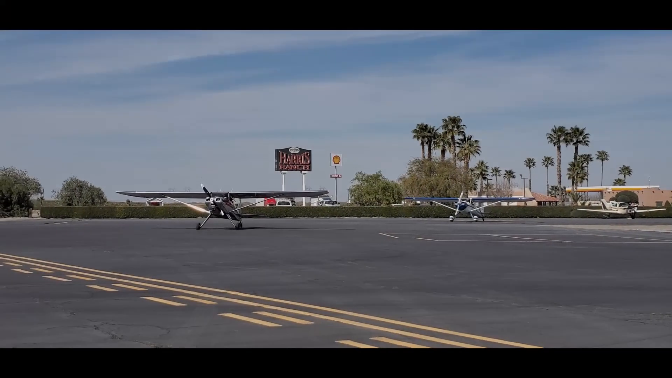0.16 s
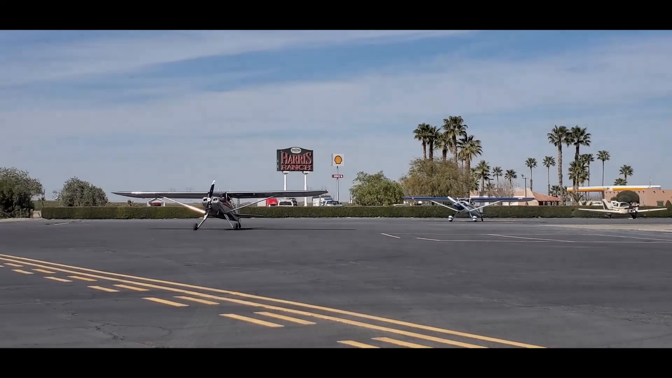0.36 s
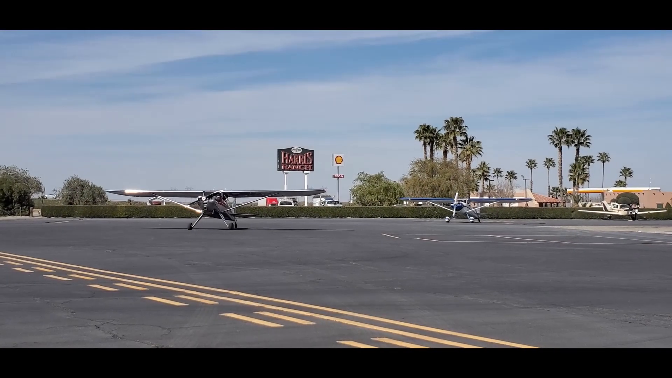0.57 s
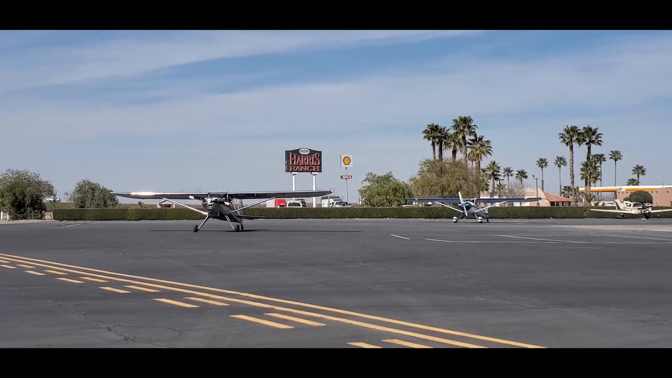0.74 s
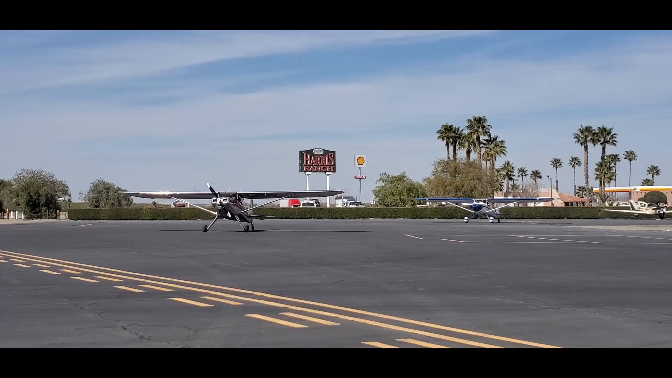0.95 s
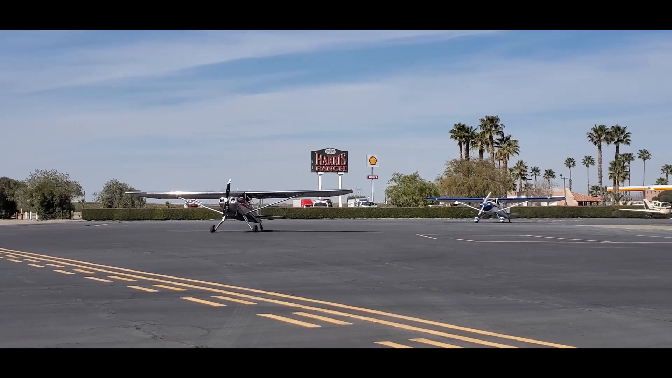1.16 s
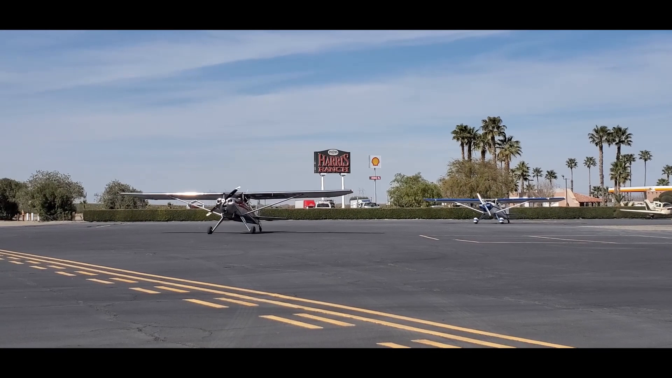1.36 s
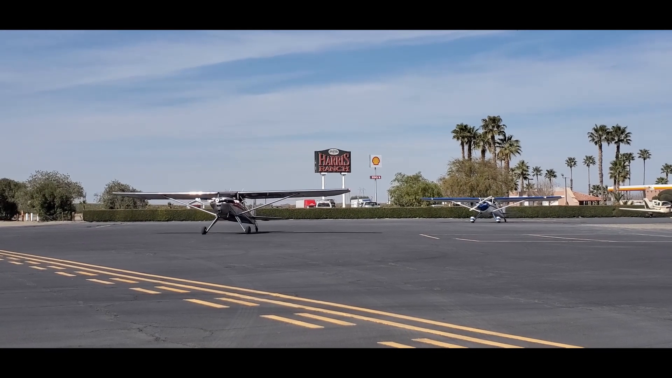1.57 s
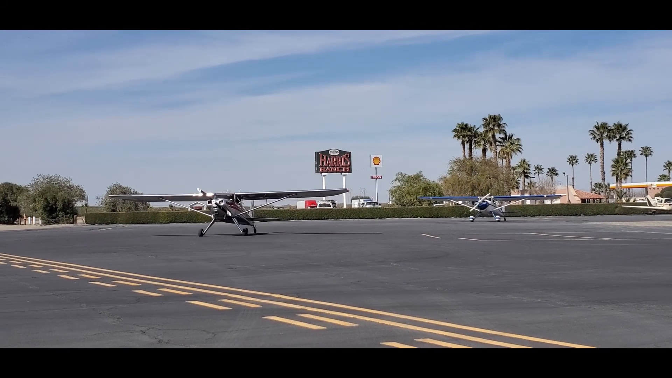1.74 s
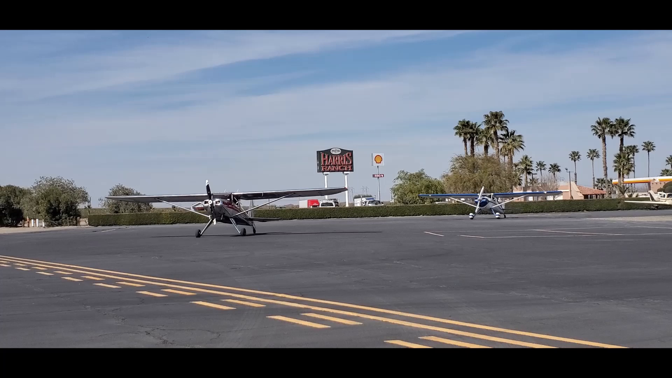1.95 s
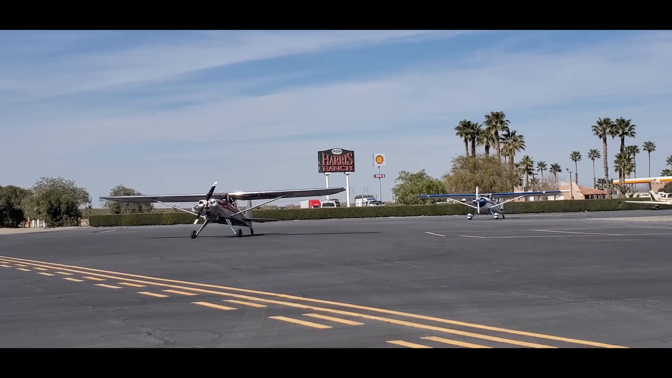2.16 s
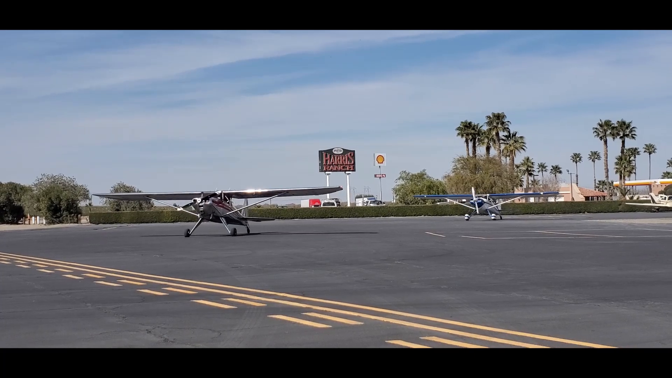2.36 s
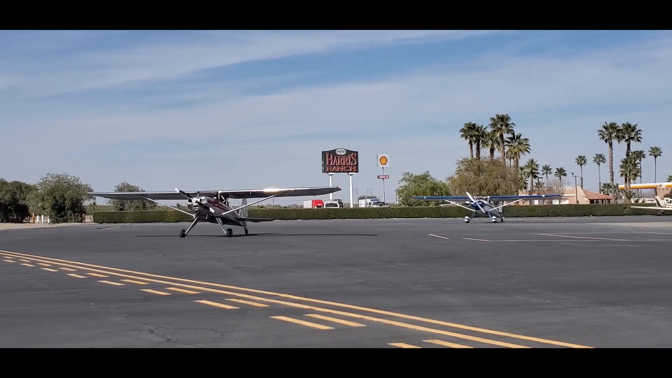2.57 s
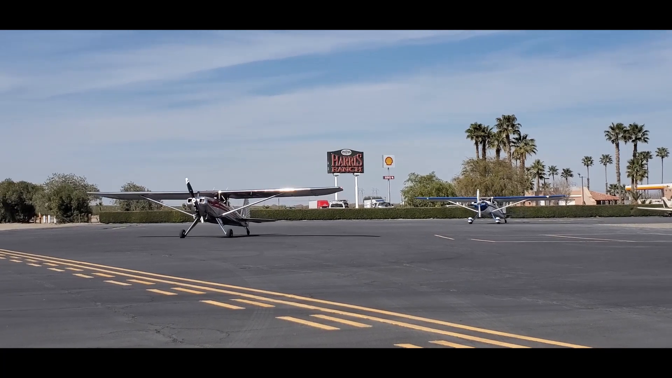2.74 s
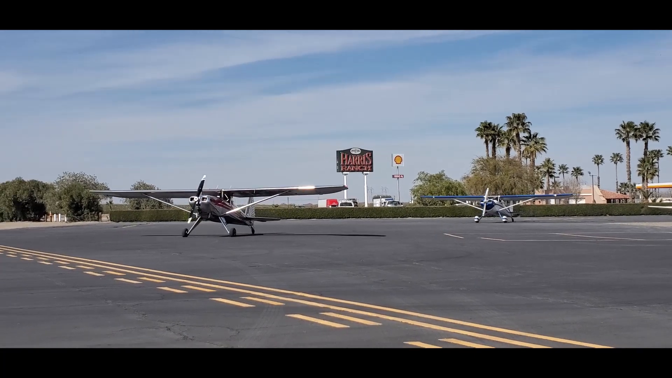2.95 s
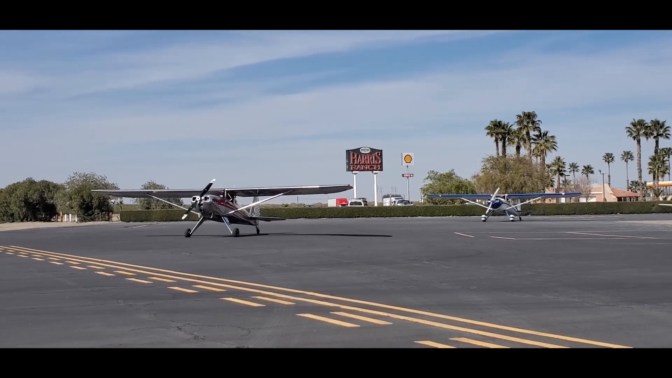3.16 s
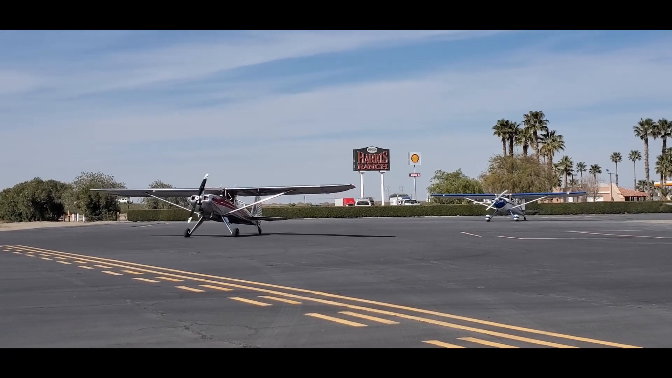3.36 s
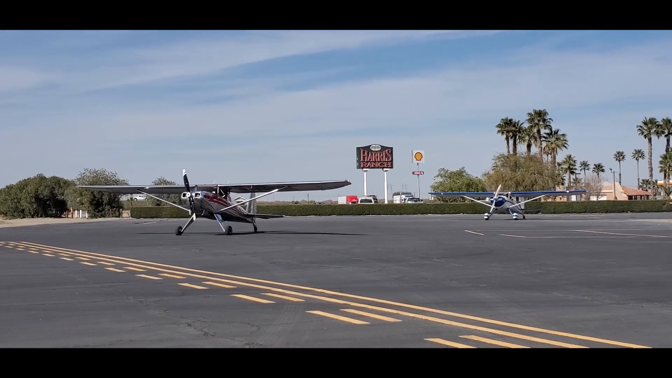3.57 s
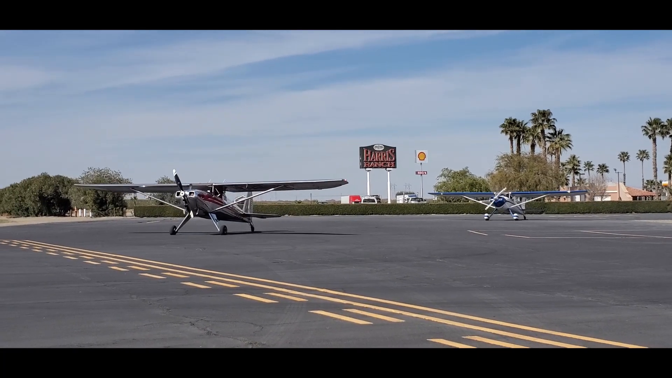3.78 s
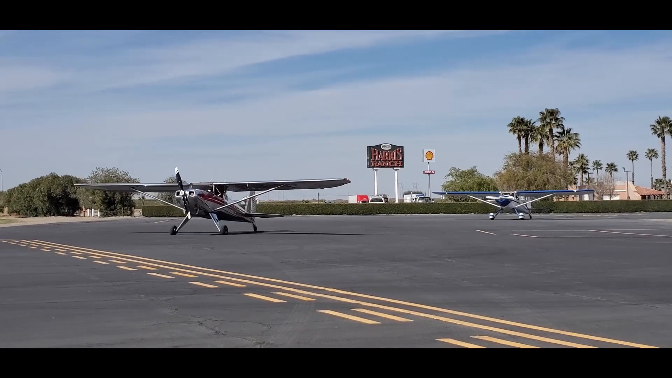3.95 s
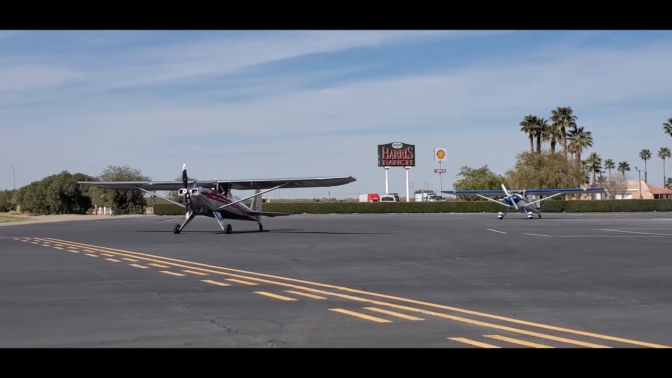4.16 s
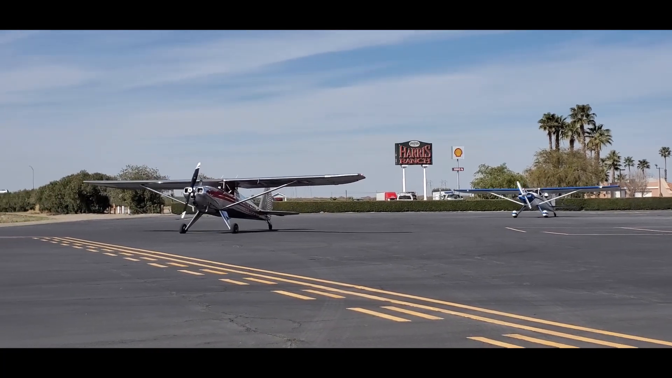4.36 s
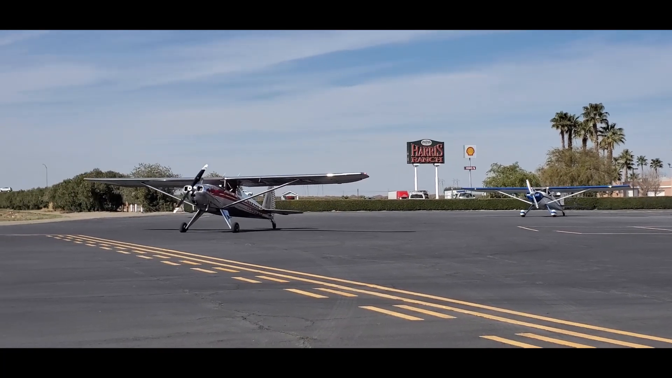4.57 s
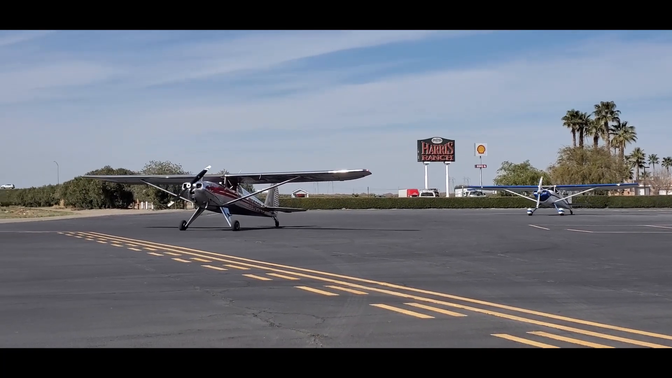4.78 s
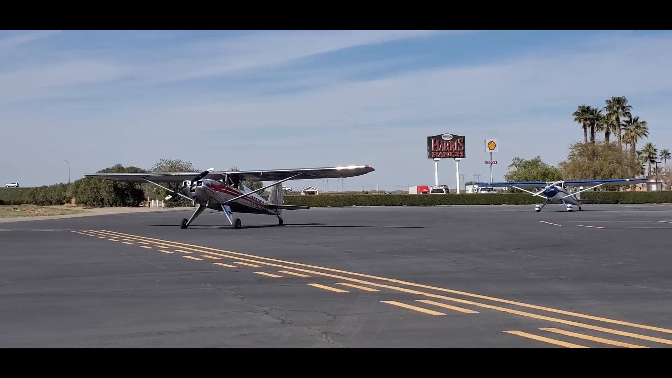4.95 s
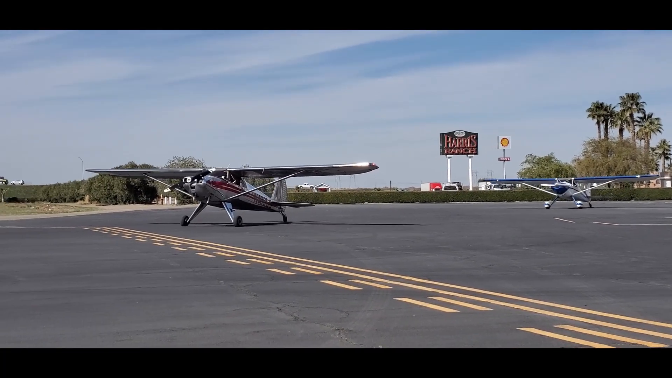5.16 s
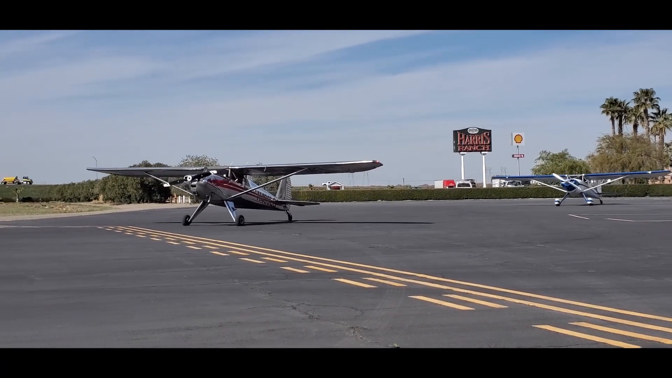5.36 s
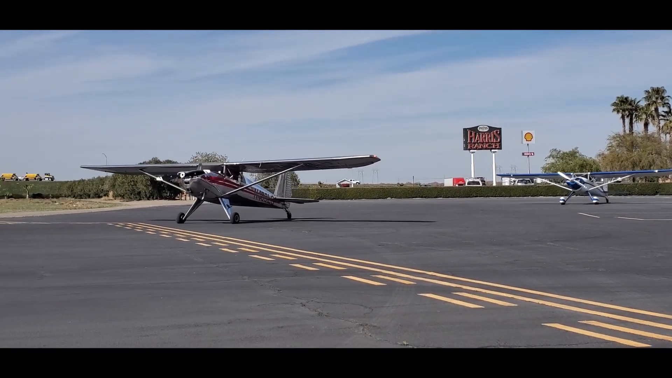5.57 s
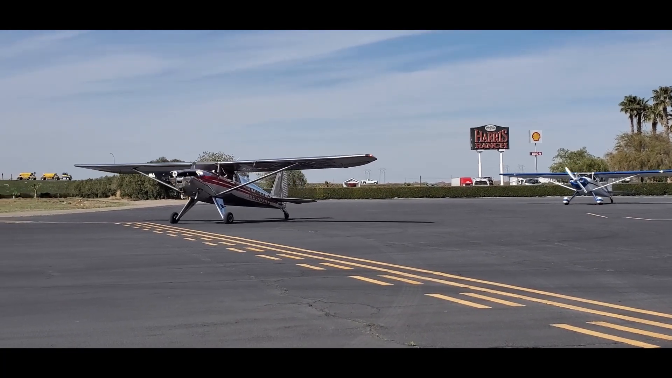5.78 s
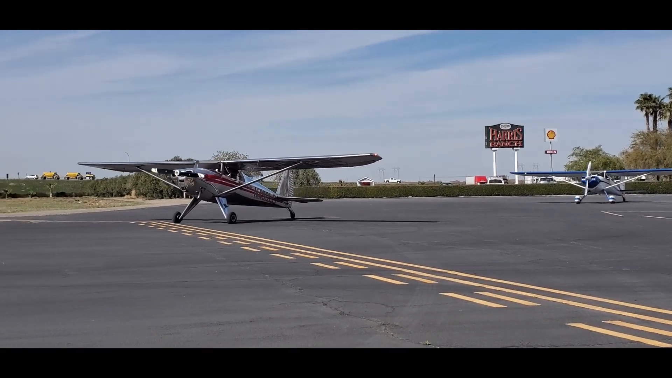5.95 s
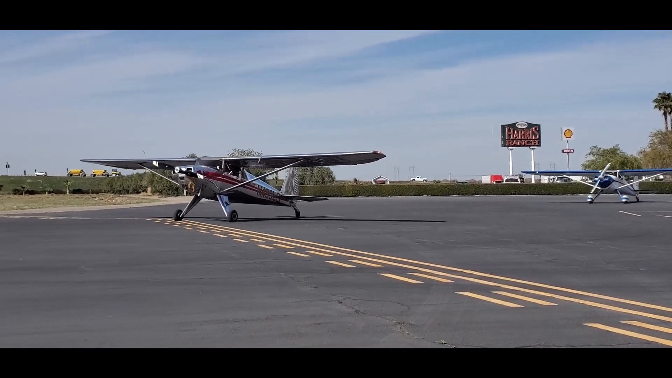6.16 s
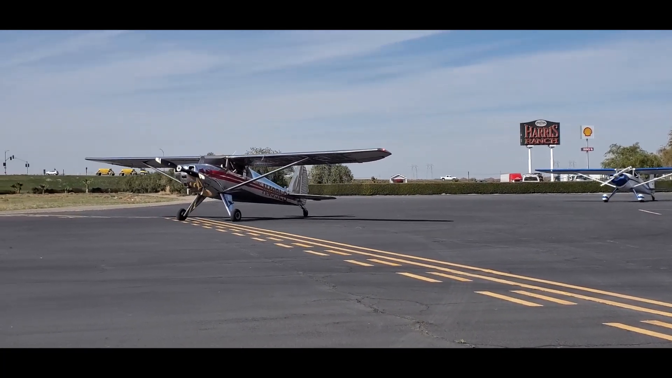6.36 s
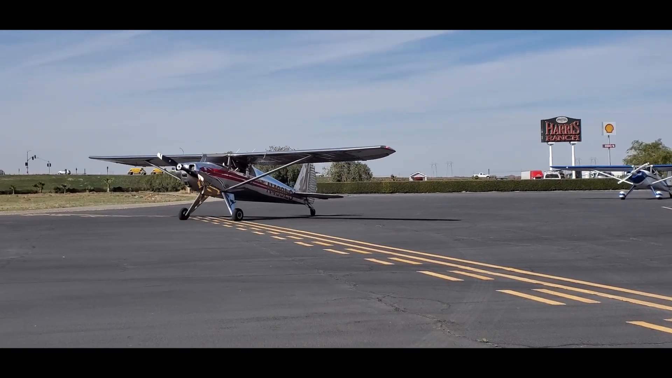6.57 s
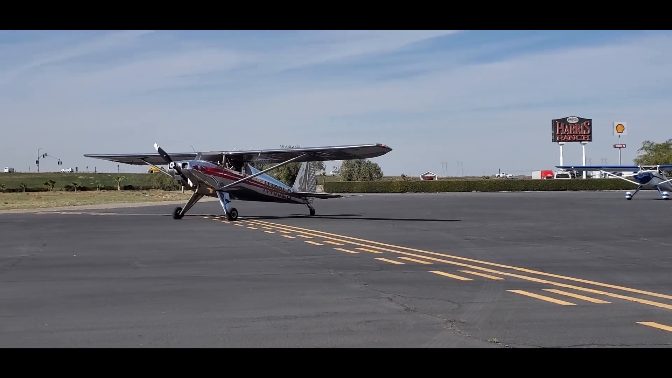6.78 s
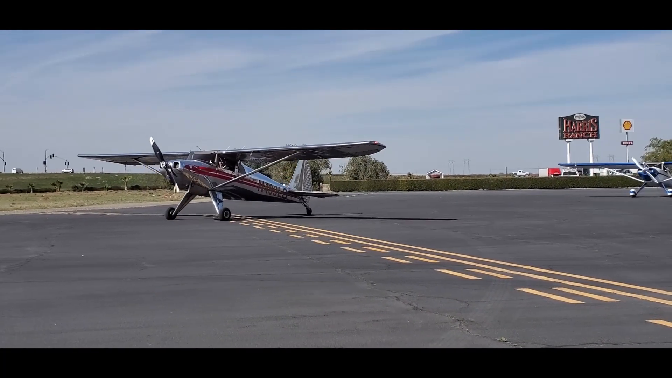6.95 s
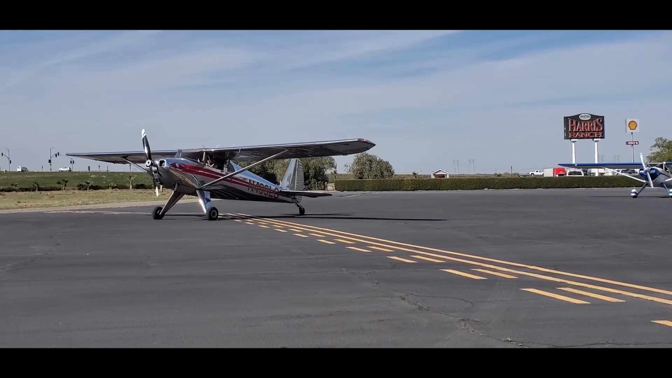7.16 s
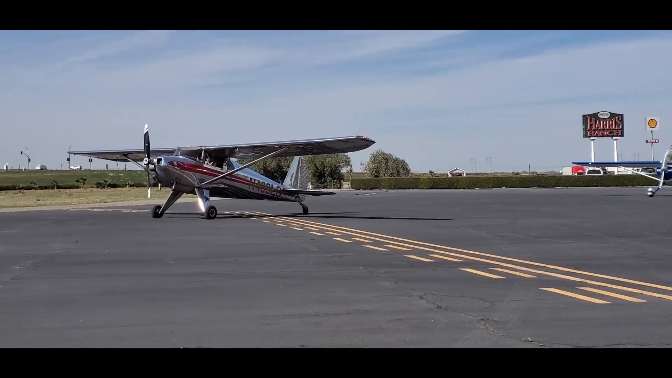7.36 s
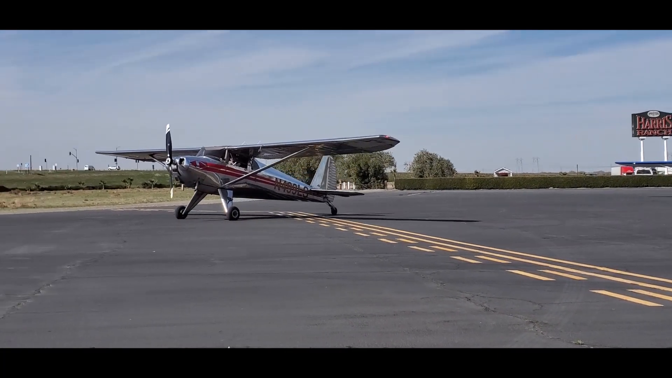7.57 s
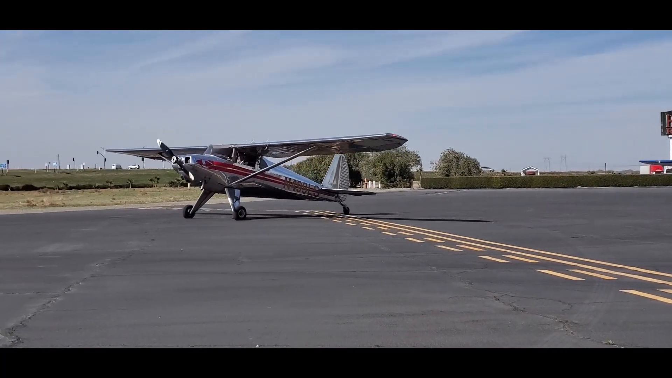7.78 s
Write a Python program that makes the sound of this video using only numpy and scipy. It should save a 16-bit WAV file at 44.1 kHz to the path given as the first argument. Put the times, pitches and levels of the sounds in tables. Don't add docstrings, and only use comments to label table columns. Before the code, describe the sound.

A small piston airplane idles and taxis nearby, its engine humming and popping rapidly through roaring propeller wash while a second plane drones farther off.

```python
import sys
import numpy as np
from scipy import signal
from scipy.fft import rfft, irfft, next_fast_len
from scipy.io import wavfile
from scipy.ndimage import uniform_filter1d, map_coordinates

SR = 44100
rng = np.random.default_rng(int(sys.argv[2]) if len(sys.argv) > 2 else 0)


def generate_wav(sig):
    pcm = np.round(np.clip(np.atleast_2d(sig).T, -1, 1) * 32767).astype(np.int16)
    wavfile.write(sys.argv[1], SR, pcm)


def nominal_scale(level):
    x = np.asarray(level, float) / 20
    return 10 ** x


N = 344862
T = np.arange(N) / SR


def unit(x):
    return x / np.sqrt(np.mean(x ** 2))


def curves(table):
    s, *columns = np.transpose(table)
    return [np.interp(T, s, column) for column in columns]


def along(table, hz):
    table_hz, value = np.transpose(table)
    return np.interp(np.log(hz + 1), np.log(table_hz), value)


def ring(x, hz, width_hz):
    b, a = signal.iirpeak(hz, hz / width_hz, fs=SR)
    return signal.lfilter(b, a, signal.lfilter(b, a, x))


def walk(rate_hz, stride=1):
    steps = np.repeat(rng.standard_normal(int(N / SR * rate_hz) + 2), 8)
    soft = uniform_filter1d(uniform_filter1d(steps, size=8), size=8)
    return 1.3 * np.interp(T[::stride] * rate_hz * 8, np.arange(len(soft)), soft)


# [start_s, firing_rate_hz]
NEAR_THROTTLE = [(0, 28.58), (.59, 29.147), (.761, 29.521), (1.266, 28.807), (1.515, 29.697),
                 (1.776, 28.947), (1.993, 29.401), (3.015, 28.96), (3.496, 31.505), (4.075, 29.927),
                 (4.495, 29.799), (5.31, 30.095), (5.877, 30.209), (6.063, 29.859), (6.264, 30.339),
                 (7.216, 29.701), (7.82, 30.6)]
# [start_s, firing_rate_hz]
FAR_THROTTLE = [(0.0, 37.642), (0.6, 37.426), (1.2, 37.321), (1.8, 36.81), (2.41, 35.784), (3.01, 35.034),
                (3.61, 34.781), (4.21, 34.662), (4.81, 34.532), (5.41, 34.644), (6.02, 34.836),
                (6.62, 34.701), (7.22, 34.634), (7.82, 34.576)]


def firing_counts():
    return [np.cumsum(curves(table)[0]) / SR for table in (NEAR_THROTTLE, FAR_THROTTLE)]


def hum(firings, level_db, orders, lag, muffler, scatter):
    stride = 8
    slow_firings = firings[::stride] - lag
    out = 0
    for k, db in orders:
        uneven = k % 4 > 0
        turns = k / 4 * slow_firings + (k > muffler) / 2
        turns = turns + uneven * scatter * (rng.random() - 1)
        slip_rad = .12 * (1 + uneven) * walk(5, stride)
        wander_db = .9 * (.5 + uneven) * walk(4, stride)
        out = out + nominal_scale(db - 1.5 * uneven + wander_db) * np.cos(2 * np.pi * turns + slip_rad)
    return np.sqrt(2) * nominal_scale(level_db) * np.interp(T, T[::stride], out)


# [multiple of the four-firing cycle, level_db]
NEAR_ORDERS = [(4, -36), (8, -9), (9, -24), (10, -21), (11, -18), (12, 0), (13, -16), (14, -13), (15, -13),
               (16, -11), (17, -19), (18, -23), (19, -14), (20, -16), (21, -24), (22, -17), (24, -25),
               (26, -24), (27, -28), (28, -21), (32, -25)]


def near_hum(firings, fade_db):
    return hum(firings, -24.5 + 0.58 * T + fade_db, NEAR_ORDERS, lag=.255, muffler=8.7, scatter=.3)


# [peak_s, peak_db, top_hiss_db over the peak]
HARD_FIRINGS = [(0.6983, -23, -13), (1.1433, -19, -20), (1.6585, -16.5, -19), (2.239, -15, -15),
                (2.7876, -16, -21), (3.3943, -19, -20), (3.457, -13.5, -16), (3.9748, -14.5, -7),
                (4.0767, -17, -21), (4.21, -14, -17), (4.3107, -14, -22), (4.377, -16.5, -9.5),
                (4.5102, -14.5, -13), (4.6454, -13, -14), (4.7782, -13.5, -19), (4.9126, -16, -15),
                (5.0458, -13.5, -17), (5.3127, -14, -21), (5.446, -14.5, -19), (5.5782, -15.5, -25),
                (5.711, -17.5, -14), (6.0087, -17.5, -17), (6.606, -18, -11), (6.7398, -16, -13),
                (6.8734, -16, -14.5), (6.9718, -17, -8.5), (7.1067, -17.5, -7.5), (7.174, -17, -7.5),
                (7.3731, -17, -8.5), (7.64, -13.5, -13)]
CYLINDER_DB = np.array([4.0, 6.0, 1, 3.5])
CYLINDER_DB_PER_S = np.array([-0.025, -0.32, .6, 0.3])
# [pitch_hz, width_hz, level_db]
STUB = [(1420, 210, 6), (2200, 420, -3), (3278, 640, 12), (3640, 560, 12.5), (4155, 280, 8.5),
        (4890, 650, 5.5), (5460, 850, 1), (5970, 530, -17)]
# [pitch_hz, width_hz, level_db]
HISS = [(8800, 1000, -11.5), (11200, 1350, -1), (12300, 1950, 4), (13600, 1800, -5), (15300, 1300, -9)]


def exhaust(firings, spit_db, hiss_db):
    chance = rng.standard_normal((int(firings[-1]) + 3, 3 + len(STUB) + len(HISS)))
    count = np.arange(len(chance))
    cylinder = count % 4
    start = np.interp(count + 0.198, firings, T) + 0.00036 * chance[:, 0]
    drift_db = np.asarray(CYLINDER_DB_PER_S)[cylinder] * (start - T[-1] / 2)
    cylinder_db = np.asarray(CYLINDER_DB)[cylinder] + drift_db
    size_db = np.interp(start, T, spit_db) + cylinder_db + 3.45 * np.clip(chance[:, 1], -3, 1) - 3.0
    top_db = np.interp(start, T, hiss_db) + 1.28 * cylinder_db + 2.45 * chance[:, 2]
    for s, peak_db, rel_db in HARD_FIRINGS:
        nearest = np.argmin(abs(start + .0025 - s))
        start[nearest] = s - .0012
        size_db[nearest] = peak_db - 14
        top_db[nearest] = peak_db + rel_db - 12

    k = np.clip(np.searchsorted(start, T) - 1, 0, None)
    age = np.maximum(T - start[k], 0)
    tail = (1 - np.exp(-age / 0.0011)) * np.exp(-age / 0.0042)
    out, column = 0, 3
    for modes, db, fade_s in ((STUB, size_db, .0013), (HISS, top_db, .0016)):
        puff = (age / fade_s) ** 1.02 * np.exp(-age / fade_s)
        gas = rng.standard_normal((5, N))
        jet = puff * (gas[0] + .3 * gas[1:3]) + 0.58 * tail * gas[3:]
        sound = 0
        for hz, width_hz, mode_db in modes:
            colour_db = 3.8 * chance[:, column]
            sound = sound + ring(nominal_scale(mode_db + colour_db)[k] * jet, hz, width_hz) / np.sqrt(width_hz)
            column += 1
        energy = np.bincount(k, np.mean(sound ** 2, axis=0), len(count)) / (SR / 30) + 1e-12
        gain = (nominal_scale(db) / np.sqrt(energy))[k]
        out = out + sound * uniform_filter1d(gain, size=40)
    return out


# [pitch_hz, level_db per Hz]
WASH_SPECTRUM = [(20, -46), (45, -28), (90, -16.5), (170, -20.5),
                 (260, -19), (350, -25.5), (520, -23), (1000, -26), (1600, -28.5), (2100, -31), (2600, -35),
        (3600, -35.5), (5200, -49), (7800, -60.5), (9500, -54.5)]
# [pitch_hz, likeness 0-1]
LIKENESS = [(60, 0.94), (300, 0.96), (700, 0.91), (1400, 0.66), (3000, 0.21), (8000, 0.37)]


def wash(firings, level_db, left_db, rush_db):
    size = next_fast_len(N)
    hz = np.arange(size // 2 + 1) * SR / size
    like = np.clip(along(LIKENESS, hz), 0, 1)
    noise = rfft(rng.standard_normal((2, size))) * nominal_scale(along(WASH_SPECTRUM, hz))
    mid, side = noise * np.sqrt([1 + like, 1 - like])
    ports = np.array([mid + side, mid - side])
    body = irfft(ports[0] * (hz > 350) * (hz < 2000), size)
    scale = np.sqrt(np.mean(body ** 2))

    throb_db = 1.84 * np.cos(4 * np.pi * (firings - .47))
    throb_db = throb_db + 0.88 * np.cos(2 * np.pi * (firings - .3))
    throb_db = throb_db + 0.58 * np.cos(np.pi * (firings - .3))
    flank_db = (left_db + 8.0) * np.array([[1.3], [.4]])
    octave = np.log2((hz + 1) / 28)
    out, swell = 0, walk(0.72)
    for centre in np.arange(0, 9, .5):
        band_hz = 28 * 2 ** centre
        band = np.cos(np.pi * np.clip(octave - centre, -.5, .5)) ** 2
        db = level_db + 0.057 * swell + 1.65 * walk(9) + throb_db * (band_hz > 300)
        db = db + flank_db * (2200 < band_hz < 2900)
        db = db + (rush_db - rush_db.mean()) * (band_hz > 2900)
        out = out + nominal_scale(db) * irfft(ports * band, size)[:, :N]
    return out / scale


# [pitch_hz, width_hz, level_db over the wash]
PIPE = [(524.5, 49, -14), (1041, 53, -14.5), (1597, 81, -16)]


def pipe(firings, level_db):
    gust_db = 2.4 * np.cos(4 * np.pi * (firings - .4)) + 3.2 * np.cos(np.pi * (firings - .8))
    flow = rng.standard_normal(N) * nominal_scale(gust_db + 1.46 * walk(25))
    out = 0
    for hz, width_hz, db in PIPE:
        out = out + nominal_scale(level_db + db + 0.79 * walk(3.2)) * unit(ring(flow, hz, width_hz))
    return out


def slipstream(low_db, high_db):
    ridges = ((11240, 1300, low_db + 9.0), (13100, 4100, high_db + 8.0), (14500, 2700, high_db - 1))
    out = 0
    for hz, width_hz, db in ridges:
        air = rng.standard_normal((3, N))
        flutter_db = 1.5 * walk(12) + .8 * walk(1.5)
        out = out + nominal_scale(db + flutter_db) * unit(ring(air[0] + .9 * air[1:], hz, width_hz))
    return out


# [start_s, length_s, pitch_hz, level_db]
SQUEAKS = [
    (.185, .07, 14600, -51),
    (.485, .045, 14620, -51),
]


def brake():
    out = 0
    for s, length_s, hz, db in SQUEAKS:
        gate = np.clip(np.minimum(T - s, s + length_s - T) / .006, 0, 1)
        out = out + nominal_scale(db + 2.5 * walk(90)) * gate * np.sin(2 * np.pi * hz * T + .9 * walk(150))
    return out


# [multiple of the four-firing cycle, level_db]
FAR_ORDERS = [(4, -24), (5, -29), (7, -19), (8, 0), (9, -15), (10, -14), (11, -12), (12, -9), (13, -9),
              (14, -19), (15, -9), (16, -11), (17, -22), (19, -15), (26, -23)]


def far_hum(firings, fade_db):
    return hum(firings, -25.5 + fade_db, FAR_ORDERS, lag=.75, muffler=7.5, scatter=1)


def far_exhaust(firings, level_db):
    chance = rng.standard_normal((int(firings[-1]) + 2, 2))
    where = np.flatnonzero(np.diff(np.floor(firings)) > 0)
    jitter = (25 * chance[:len(where), 0]).astype(int)
    where = np.clip(where + jitter, 0, N - 1)
    ticks = np.zeros(N)
    ticks[where] = nominal_scale(3.5 * chance[:len(where), 1])
    decay = np.exp(-1 / (0.0028 * SR))
    burst = signal.lfilter([1], [1, -decay], ticks) * rng.standard_normal(N)
    return nominal_scale(level_db) * unit(ring(burst, 3540, 3100) + 0.14 * ring(burst, 14000, 5000))


# [start_s, comb_spacing_hz]
GROUND = [(0, 495), (2.5, 500.5), (5, 522), (7.82, 544)]


def tarmac(air):
    dull = signal.butter(1, [350, 5000], "bandpass", fs=SR, output="sos")
    heard_s = T - 1 / curves(GROUND)[0]
    return 0.3 * np.array([np.interp(heard_s, T, port) for port in signal.sosfilt(dull, air)])


def late(x, samples):
    return map_coordinates(x, [np.arange(N) - samples], order=2, mode="nearest")


# [start_s, share of the left flank facing the microphone 0-1]
FLANK = [(0, 0.17), (.8, 0.48), (1.6, 0.51), (2.0, 0.65), (2.4, 0.72), (3.0, 0.8), (4.2, 0.78), (4.8, 0.87),
         (5.6, 0.83), (6.6, 0.77), (7.82, 0.88)]
# [start_s, spit_db over the wash, top_hiss_db over the wash]
AIM = [(0, -7, -21.5), (1.5, -7, -24), (2.8, -5.5, -24.5), (3.6, -6, -20.5), (4.6, -3.5, -16.5),
       (5.4, -4.5, -19.5), (6.5, -5, -20), (7.3, -6, -16), (7.82, -5.5, -15)]


def scene():
    near, far = firing_counts()
    fade_db = -5 * np.clip(1 - T / 1.38, 0, 1)
    wash_db = -30.5 - 0.1483 * T + fade_db
    flank = curves(FLANK)[0]
    spit_db, hiss_db = curves(AIM)
    left_db = -31 + (-6.5 + 31) * flank
    strut_db = -73 + (-21.5 + 73) * flank
    lead_samples = 4.34 + (13.46 - 4.34) * flank

    treble = exhaust(near, wash_db + spit_db, wash_db + hiss_db)
    treble = treble + slipstream(wash_db + strut_db, wash_db - 32 + 0.3 * T)
    treble[1] = late(treble[1], lead_samples)
    air = nominal_scale(-1.0) * wash(near, wash_db, left_db, .1 * T) + pipe(near, wash_db)
    air = air + far_exhaust(far, wash_db - 20.5) + 0.8 * treble
    air = air + tarmac(air)
    return near_hum(near, fade_db) + far_hum(far, fade_db) + air + brake()


def band_limit(x):
    return signal.sosfilt(signal.butter(12, 16480, fs=SR, output="sos"), x)


# [pitch_hz, left minus right level_db]
LEAN = [(60, 1), (110, 0), (200, 1.5), (380, 0.5), (700, 3), (1290, -1), (2380, 5.5), (4400, 1),
        (8120, -1.5), (15000, 4)]


def record(dry):
    size = next_fast_len(N + SR // 10)
    hz = np.arange(size // 2 + 1) * SR / size
    lead = np.exp(2j * np.pi * hz * .9 / SR)
    tilt = nominal_scale(along(LEAN, hz) / 2) * lead
    top = 1 / (1 + (hz / 15750) ** 200) + nominal_scale(-24)
    shadow = 1 - 0.39 * np.exp(-((hz - 7760) / 570) ** 2)
    edge = np.pad(dry, ((0, 0), (0, size - N)), mode="reflect")
    mix = irfft(rfft(edge) * top * shadow * np.array([tilt, 1 / tilt]), size)[:, :N]
    return band_limit(mix)


dry = scene()
out = record(dry)
generate_wav(out)
```